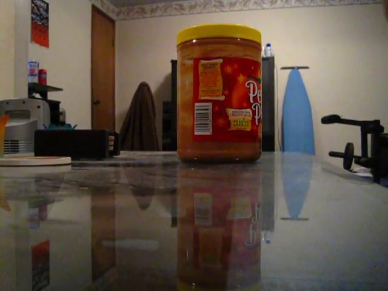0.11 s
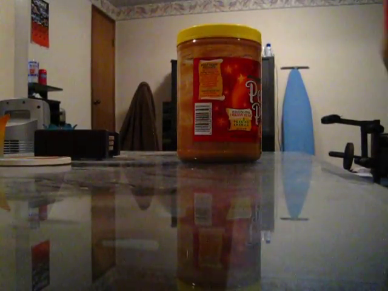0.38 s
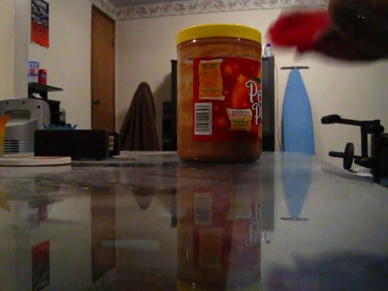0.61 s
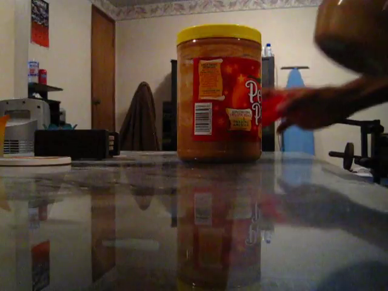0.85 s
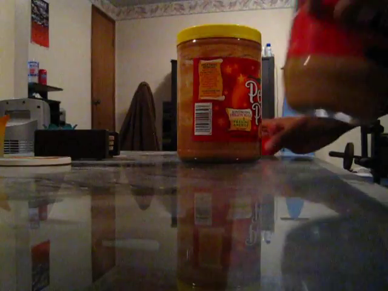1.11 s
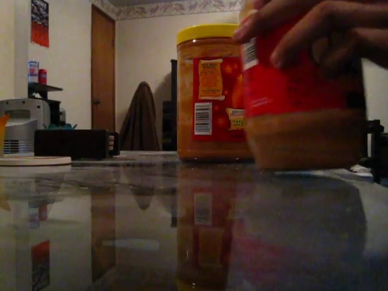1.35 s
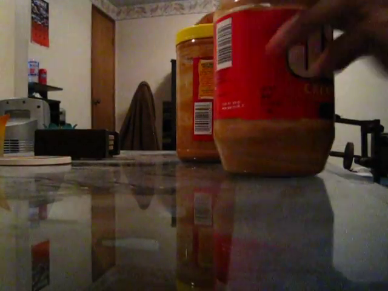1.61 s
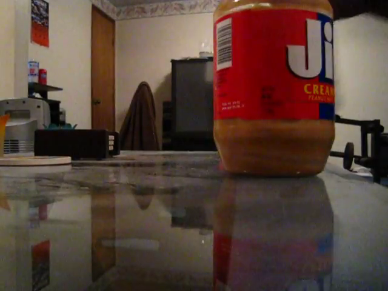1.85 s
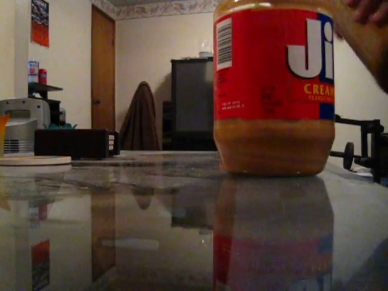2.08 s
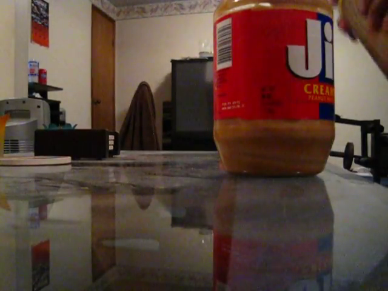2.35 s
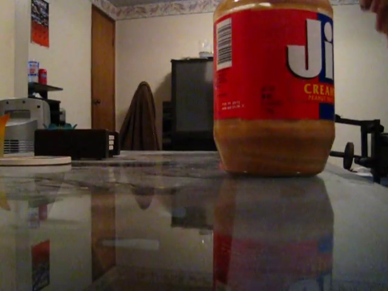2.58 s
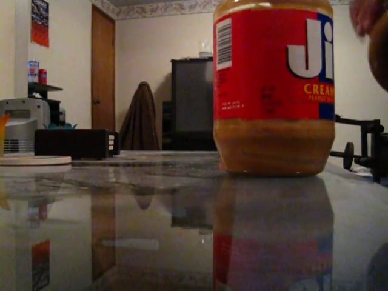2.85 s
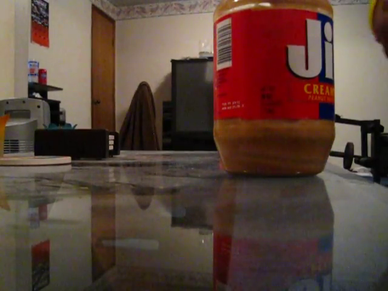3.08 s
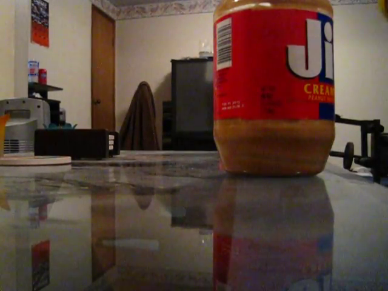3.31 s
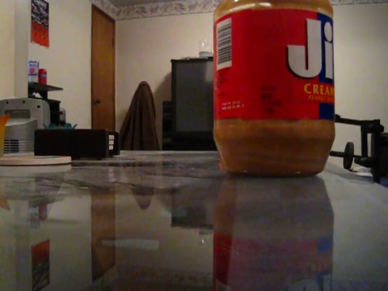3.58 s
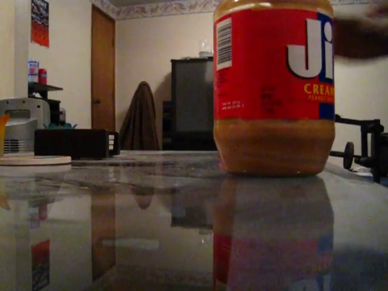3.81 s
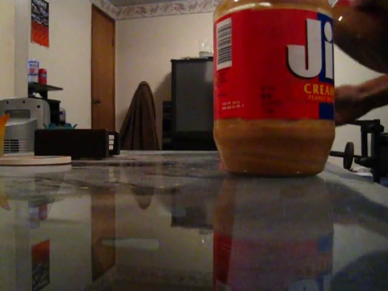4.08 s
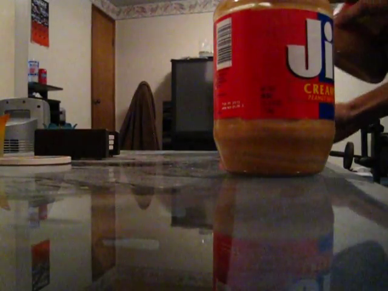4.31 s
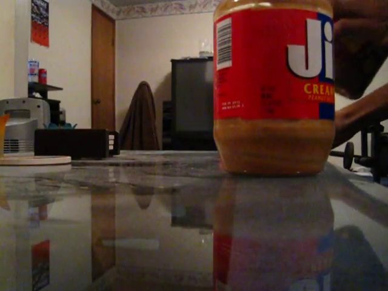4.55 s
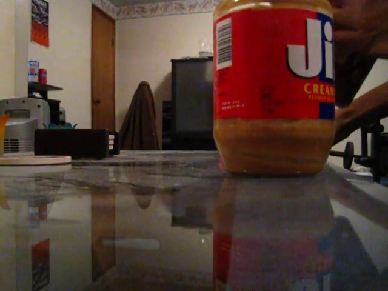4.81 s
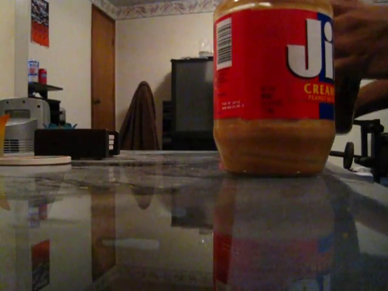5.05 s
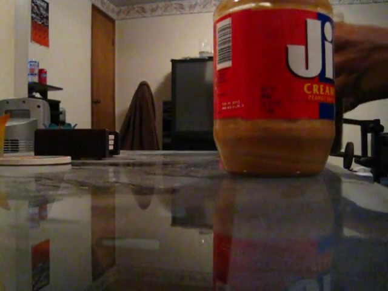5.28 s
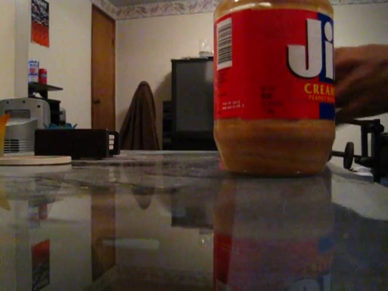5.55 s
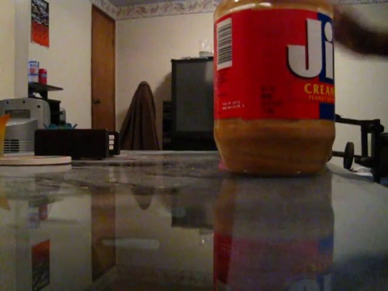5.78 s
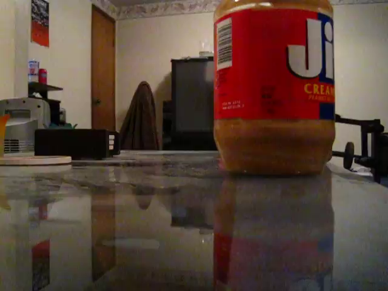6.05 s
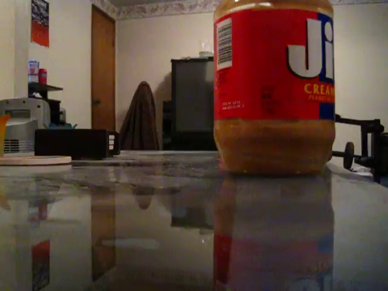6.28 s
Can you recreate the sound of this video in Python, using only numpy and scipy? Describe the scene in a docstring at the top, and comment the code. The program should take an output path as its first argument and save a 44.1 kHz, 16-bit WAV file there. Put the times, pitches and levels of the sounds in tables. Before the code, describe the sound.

A small close microphone, dipping in level after hard blows, catches full plastic jars being moved on a glass table. Soft knocks and papery rubbing lead to a sharp hard clack and a tumbling set-down. Sparse slides and ticks follow, then a second strong clack, a low crunchy thud with chattering glass, and a bright last snap, over steady room and fan noise.

```python
"""Full plastic jars clack, knocked together and handled: modes ring under noise cracks and short taps.
Knocked in the hand, later set down on a glass table, they thump, boom and snap (decaying sines, noise);
something loose chatters. Fingers scrape, squeak and slide on labels over a low gritty rumble (noise strokes).
A fan hums in a furnished room: steady noise and two wavering tones.
A close small camera turns its gain down for a moment after loud blows."""
import sys
import numpy as np
from scipy import signal
from scipy.fft import rfft, irfft, next_fast_len
from scipy.io import wavfile
from scipy.ndimage import uniform_filter1d, map_coordinates

SR = 44100
rng = np.random.default_rng(int(sys.argv[2]) if len(sys.argv) > 2 else 0)


def natural_amplitude(level_db):
    """Convert a level in decibels to a linear amplitude factor, elementwise."""
    exponent = np.asarray(level_db, float) / 20
    return 10 ** exponent


def generate_wav(sig):
    """Save sig (samples, or channels by samples) to the path in sys.argv[1] as 16-bit PCM at SR."""
    pcm = np.round(np.clip(np.atleast_2d(sig).T, -1, 1) * 32767).astype(np.int16)
    wavfile.write(sys.argv[1], SR, pcm)


N = 282504  # scene length, samples
SPAN = 14400  # length of one blow, samples
T = np.arange(SPAN) / SR


def unit(x):
    """Scaled to rms 1."""
    return x / np.sqrt(np.mean(x ** 2) + 1e-20)


def along(points, hz):
    """(f/Hz, value) points read on a log frequency axis."""
    f, v = np.transpose(points)
    return np.interp(np.log(hz + 1), np.log(f + 1), v)


def wobble(knots_per_s):
    """A smooth random curve."""
    knots = rng.standard_normal(int(N * knots_per_s / SR) + 4)
    return map_coordinates(knots, [np.arange(N) * knots_per_s / SR])


def coloured(noise, spectrum):
    """Noise filtered by (f/Hz, level/dB) points, rms 1."""
    m = next_fast_len(N + 8192)
    gain = natural_amplitude(along(spectrum, np.fft.rfftfreq(m, 1 / SR)))
    return unit(irfft(rfft(noise, m) * gain, m)[:N])


def add(track, start_s, sound):
    """Mixes a sound into a track at a time."""
    part = track[max(round(start_s * SR), 0):][:len(sound)]
    part += sound[:len(part)]


def stroke(start_s, length_s, first_db, last_db):
    """The gain of one stroke: quick touch, steady change of pressure, lift."""
    touch_db_per_s, lift_db_per_s = 516, 362
    t = np.arange(N) / SR - start_s
    fade_db = touch_db_per_s * np.maximum(-t, 0) + lift_db_per_s * np.maximum(t - length_s, 0)
    pressure_db = np.interp(t, [0, max(length_s, 0.005)], [first_db, last_db])
    return natural_amplitude(pressure_db - fade_db)


def ring(modes, centre_hz, octaves, freedom):
    """Modes near the blow's colour ring most; place and grip weigh and tune them anew each blow."""
    hz, db, t60_s = np.transpose(modes)[:, :, None]
    bell_db = -6 * (np.log2(hz / centre_hz) / octaves) ** 2
    db = db + bell_db + 1.54 * rng.standard_normal(hz.shape)
    hz = hz * (1 + 0.0083 * rng.standard_normal(hz.shape))
    decay = natural_amplitude(db - 60 * T / (freedom * t60_s))
    return np.sum(decay * np.sin(2 * np.pi * hz * T), axis=0)


def crack(centre_hz, octaves_below, octaves_above, t60_s, rise_s):
    """A dying burst of noise around one colour; rms 1 before rise and decay."""
    octaves = np.log2((np.fft.rfftfreq(SPAN, 1 / SR) + 1) / centre_hz)
    bell_db = -6 * (octaves / np.where(octaves < 0, octaves_below, octaves_above)) ** 2
    noise = unit(irfft(rfft(rng.standard_normal(SPAN)) * natural_amplitude(bell_db)))
    return noise * natural_amplitude(-60 * T / t60_s) * (1 - np.exp(-T / rise_s))


# room decay: (f/Hz, t60/s)
ROOM_T60 = [(200, 0.51), (1500, 0.19), (4500, 0.19), (6000, 0.17), (14000, 0.082)]


def reverberant(sound, wet_db):
    """A sound plus its room tail: noise dying at a rate set by frequency, drawn anew for each blow."""
    hz, t, z = signal.stft(rng.standard_normal(SPAN), SR, nperseg=256)
    decay = natural_amplitude(-60 * t / along(ROOM_T60, hz)[:, None])
    tail = signal.istft(z * decay, SR, nperseg=256)[1]
    tail = np.pad(tail / np.linalg.norm(tail), (130, 0))  # tail starts 130 samples late
    return sound + natural_amplitude(wet_db) * signal.fftconvolve(sound, tail)[:SPAN]


# room noise spectrum: (f/Hz, relative level/dB per Hz)
AIR_SPECTRUM = [(25, -11.5), (60, -10), (144, -7), (175, -5), (392, -9), (905, -13), (1730, -19),
                (4700, -27.5), (5400, -24.5), (15800, -30)]
# fan tones: (f/Hz, level/dB)
FAN_TONES = [(175, -58.5), (1051, -54.5)]


def room_tone():
    """Steady noise with the slightly unsteady tones of a fan."""
    air_gain = natural_amplitude(-48 + 0.86 * wobble(3.82))
    out = air_gain * coloured(rng.standard_normal(N), AIR_SPECTRUM)
    for hz, db in FAN_TONES:
        turns = np.cumsum(hz * (1 + 0.002006 * wobble(8))) / SR
        out += np.sqrt(2) * natural_amplitude(db + 0.8 * wobble(10)) * np.sin(2 * np.pi * turns)
    return out


# paper hiss spectrum before tilt: (f/Hz, relative level/dB per Hz)
HISS_SPECTRUM = [(4500, -3), (7000, -2), (9000, 4), (11500, -1), (15800, -9)]
# fingers on the paper label: (t/s, length/s, first level/dB, last level/dB, tilt/dB per octave)
SLIDES = [(0.07, 0.062, -41.5, -48, -8.5), (0.158, 0.087, -40, -46.5, -0.5), (1.963, 0.013, -44, -40.5, 0),
          (2.318, 0.14, -44, -54, -2.5), (2.457, 0.042, -43, -39.5, 4.5), (2.763, 0.093, -50.5, -46.5, -4),
          (2.9, 0.365, -55, -53.5, -1.5), (3.33, 0.1, -44.5, -47.5, 9.5), (3.46, 0.041, -51, -43, 1),
          (5.858, 0.1, -52.5, -54, -4)]


def slides():
    """Fingers slide over the paper label: fluttering fine hiss, tilted in brightness per stroke."""
    flutter_db = 2.5 * wobble(300) + 1.5 * wobble(40)
    paper = rng.standard_normal(N) * natural_amplitude(flutter_db)
    out = np.zeros(N)
    for *row, tilt_db in SLIDES:
        tilted = [(hz, db + tilt_db * np.log2(hz)) for hz, db in HISS_SPECTRUM]
        out += stroke(*row) * coloured(paper, tilted)
    return out


# rumble spectrum: (f/Hz, relative level/dB per Hz)
RUMBLE_SPECTRUM = [(120, -16), (230, -1), (400, 5), (700, -3), (1100, -23)]
# low rubbing strokes: (t/s, length/s, first level/dB, last level/dB)
RUMBLES = [(0.094, 0.025, -31, -36.5), (0.182, 0.069, -34.5, -33), (5.38, 0.0061, -50, -20.5)]


def rumbles(grit):
    """Low gritty rumble as the jar is handled and set down: coloured noise under stroke gains."""
    rumble = coloured(rng.standard_normal(N) * grit, RUMBLE_SPECTRUM)
    return rumble * sum(stroke(*row) for row in RUMBLES)


# scrape spectrum: (f/Hz, relative level/dB per Hz)
SCRAPE_SPECTRUM = [(700, 4), (1300, 4.5), (1900, 6.5), (2600, -6.5), (4000, -6), (5000, -11), (6500, -48)]
# fingers on the jar wall: (t/s, length/s, first level/dB, last level/dB)
SCRAPES = [(0.067, 0.06, -48.5, -37.5), (0.21, 0.048, -36.5, -62), (1.293, 0.2, -47, -31.5),
           (1.958, 0.025, -43, -46), (2.481, 0.031, -52.5, -52.5), (2.837, 0.11, -42, -55.5),
           (3.023, 0.27, -51.5, -63), (3.458, 0.035, -45.5, -41), (4.62, 0.067, -46.5, -55)]


def scrapes(grit):
    """Fingers drag on the jar wall: gritty noise."""
    scrape = coloured(rng.standard_normal(N) * grit, SCRAPE_SPECTRUM)
    return scrape * sum(stroke(*row) for row in SCRAPES)


# fingertip on the jar wall: (t/s, length/s, level/dB, f/Hz)
SQUEAKS = [(1.437, 0.022, -39, 1800), (4.41, 0.12, -51.5, 1880)]


def squeaks(grit):
    """A fingertip squeaks on the jar wall: narrow noise around one pitch."""
    out = np.zeros(N)
    for start_s, length_s, db, hz in SQUEAKS:
        narrow = [(hz / 2, -60), (hz / 1.4, -10), (hz / 1.2, -16), (hz, 0), (hz * 1.4, -60)]
        squeak = coloured(rng.standard_normal(N), narrow) * grit
        out += squeak * stroke(start_s, length_s, db, db)
    return out


def rubs():
    """Rubbing sticks and slips: one grit gain shared by scrapes, rumbles and squeaks; paper flutters apart."""
    grit = natural_amplitude(4 * wobble(160) + 2 * wobble(45))
    return scrapes(grit) + rumbles(grit) + squeaks(grit) + slides()


def chatter(count=8):
    """Something loose ticks on the shaking glass, tending weaker and duller; no room tail."""
    start_s, gap_s, jitter_s = 5.3812, 0.0167, 0.00015
    first_hz, hz_ratio = 9700, 0.96
    first_db, loss_db, spread_db = -16, 2.4, 2.7
    out = np.zeros(N)
    for k, (late, louder) in enumerate(rng.standard_normal((count, 2))):
        if k % 3 == 2:  # every third swing is silent
            continue
        tick = crack(first_hz * hz_ratio ** k, 1.3, 0.47, t60_s=0.0074, rise_s=0.00021)
        db = first_db - k * loss_db + spread_db * louder
        add(out, start_s + k * gap_s + jitter_s * late, natural_amplitude(db) * tick)
    return out


# lasting modes of the whole pane: (f/Hz, level/dB, t60/s)
BOOM_MODES = [(61.5, -3, 0.56), (496, -8, .45)]
# heavy landings: (t/s, level/dB)
BOOMS = [(1.369, -38), (1.49, -48), (5.366, -32), (5.409, -28)]


def booms():
    """Heavy landings set the whole pane swinging; it holds a while, then dies quickly."""
    out, t = np.zeros(N), np.arange(SR) / SR
    for start_s, db in BOOMS:
        swing = np.zeros(SR)
        for hz, mode_db, t60_s in BOOM_MODES:
            decay = natural_amplitude(mode_db - 60 * (t / t60_s) ** 2)
            swing += decay * np.sin(2 * np.pi * hz * (t + start_s))
        add(out, start_s, natural_amplitude(db) * (1 - np.exp(-t / 0.003)) * swing)
    return out


# something small and stiff: (t/s, level/dB, f/Hz)
SNAPS = [(0.257, -22.5, 4000), (0.412, -31, 3750), (1.361, -48, 4700), (1.399, -40, 4670),
         (1.452, -38, 4600), (2.787, -26.5, 1720), (2.917, -41, 2620), (3.474, -42, 6000),
         (3.496, -27.5, 4340), (3.758, -41, 1800), (3.946, -42, 2000), (6.3319, -15, 3520)]


def snaps():
    """Dry snaps: one quickly dying note with an edge that brightens with force, almost without room."""
    out = np.zeros(N)
    for start_s, db, hz in SNAPS:
        note = natural_amplitude(5) * np.sin(2 * np.pi * hz * T) * natural_amplitude(-60 * T * hz / 14)  # -60 dB in 14 cycles
        octaves_above = max(2.0 + 0.022 * db, 0.5)
        edge = natural_amplitude(-3) * crack(1.13 * hz, 0.88, octaves_above, t60_s=0.013, rise_s=0.000061)
        add(out, start_s, natural_amplitude(db) * reverberant(note + edge, wet_db=-18.5))
    return out


# low modes, as of a glass pane: (f/Hz, level/dB, t60 at freedom 1/s)
THUMP_MODES = [(117, -4.5, 0.18), (171, 2.5, 0.082), (265.5, -4, 0.17), (387, -5.5, 0.25),
               (451.6, 3.5, 0.1), (593, 11, 0.017), (750, -8, 0.059), (838, -1, 0.057), (1163, -9, 0.22)]
# low thumps: (t/s, level/dB, colour centre f/Hz, freedom to ring: low when damped)
THUMPS = [(0.012, -18.5, 548, 0.092), (0.077, -14, 577, 0.09), (0.111, -19, 440, 0.088),
          (0.173, -21.5, 490, 0.14), (0.1963, -25.5, 477, 0.1), (0.224, -29.5, 420, 0.11),
          (0.238, -20.5, 557, 0.3), (1.371, -31, 184, 0.8), (1.4916, -28.5, 206, 0.8),
          (2.696, -34, 237, 0.82), (2.787, -31.5, 312, 0.56), (2.892, -43, 390, 0.96),
          (3.498, -37, 440, 0.39), (5.367, -22.5, 460, 1), (5.376, -18, 513, 0.23),
          (5.385, -23.5, 130, 0.52), (5.392, -14, 766, 0.42), (5.408, -23, 620, 0.78),
          (5.43, -22, 262, 0.49), (5.457, -24, 654, 0.81)]


def thumps():
    """Low thumps: a jar knocked in the hand, later jars set down; the less damped, the more crunch and ring."""
    out = np.zeros(N)
    for start_s, db, centre_hz, freedom in THUMPS:
        freedom = max(freedom, 0.1)
        thump = 2.12 * np.sin(2 * np.pi * centre_hz * T) * natural_amplitude(-60 * T * centre_hz / 11)  # 11 cycles
        ringing = freedom * natural_amplitude(4.5) * ring(THUMP_MODES, centre_hz, 1.0, freedom)
        knock = (thump + ringing) * (1 - np.exp(-T / 0.0013))
        crunch = freedom * natural_amplitude(-1.0) * crack(centre_hz, 0.43, 1.46, 0.16 * freedom, rise_s=0.001)
        add(out, start_s, natural_amplitude(db) * reverberant(knock + crunch, wet_db=-10))
    return out


# jar wall and lid modes: (f/Hz, level/dB, t60 of the free jar/s)
JAR_MODES = [(393, 2.5, 0.12), (802.4, -8, 0.31), (1237, 5.5, 0.045), (1560, 6, 0.027), (1800, -3.5, 0.12),
             (2132, 4, 0.07), (2690, 1.5, 0.067), (3510, -8, 0.17), (3906, 6, 0.075), (4440, 3, 0.086),
             (4690, 5, 0.029), (6120, 5, 0.05), (7690, 0, 0.086)]
# hard plastic blows: (t/s, level/dB, colour centre/octaves above 1 kHz, contact softness/ms)
CLACKS = [(0.0107, -29.5, 1, 0.49), (0.0749, -31, 1.24, 0.47), (0.2373, -20.5, 0.87, 1.1),
          (0.2466, -21, 1.08, 0.1), (1.014, -2.5, 0.915, 0.75), (1.1762, -16, 1.04, 2.1),
          (1.2452, -17, 1.05, 3.4), (1.3005, -24.5, 0.94, 2.7), (1.311, -23, 0.48, 1.3),
          (1.357, -20.5, 0.61, 1.1), (1.369, -21.5, 0.68, 0.18), (1.397, -21.5, 0.63, 1.7),
          (1.449, -19, 1, 1.9), (1.4694, -16, 1.3, 1), (1.955, -31, 1.8, 0.56), (2.3069, -32.5, 1.4, 2.2),
          (2.699, -32, 0.7, 0.3), (2.882, -34.5, 1.4, .25), (3.4958, -26, 1.22, 0.4),
          (4.293, -6.5, 0.87, 0.62), (4.503, -31.5, 0.66, 2.8), (5.3646, -20, 0.56, 0.55),
          (5.3913, -17, 0.92, 0.43), (5.4095, -19, 0.33, 0.31), (5.4576, -23.5, 0.57, 0.17)]


def clacks():
    """The full jar rings under a crack; glancing contacts start softer and grate longer, hard ones brighter."""
    contact_t60_s, t60_per_rise = 0.017, 4.2
    jar_freedom = 0.68  # share of the free ring time left by hand and contents
    out = np.zeros(N)
    for start_s, db, above, soft_ms in CLACKS:
        centre_hz, rise_s = 1000 * 2 ** above, max(soft_ms, 0.1) / 1000
        octaves = max(1.53 + 0.019 * db, 0.5)
        t60_s = contact_t60_s + t60_per_rise * rise_s
        snap = natural_amplitude(-3.0) * crack(centre_hz, 1.0, octaves, t60_s, rise_s)
        # the struck spot flexes: -60 dB in 24 cycles
        tap = natural_amplitude(3.0) * np.sin(2 * np.pi * centre_hz * T) * natural_amplitude(-60 * T * centre_hz / 24)
        jar = natural_amplitude(-17.5) * ring(JAR_MODES, centre_hz, octaves, jar_freedom)
        body = (tap + jar) * (1 - np.exp(-T / rise_s))
        add(out, start_s, natural_amplitude(db) * reverberant(snap + body, wet_db=-9))
    return out


def scene():
    """All sources, heard from one point."""
    return (room_tone() + rubs() + chatter() + booms() + snaps() + thumps() + clacks())[None]


def gain_control(dry):
    """Gain drops when a blow passes the threshold, by 8 dB at most, and slowly recovers."""
    threshold_db, attack_s, recovery_s = -14, 0.0067, 0.25
    over_db = np.maximum(20 * np.log10(np.abs(dry) + 1e-9) - threshold_db, 0)
    held_db = uniform_filter1d(over_db, 220, axis=1)
    keep = np.exp(-1 / (recovery_s * SR))
    cut_db = signal.lfilter([1 / (attack_s * SR)], [1, -keep], held_db, axis=1)
    return dry * natural_amplitude(-np.minimum(cut_db, 8))


# microphone behind its port: (f/Hz, level/dB)
MIC_RESPONSE = [(4700, 1), (5400, -3.5), (12000, -6.5)]


def microphone(sound):
    """Microphone colour; the band ends sharply."""
    top_hz = 15850
    hz = np.fft.rfftfreq(N, 1 / SR)
    return irfft(rfft(sound) * natural_amplitude(along(MIC_RESPONSE, hz)) * (hz < top_hz), N)


def top_cut(x):
    """Nothing passes above the cut-off."""
    return signal.sosfilt(signal.butter(12, 16740, fs=SR, output="sos"), x)


def record(dry):
    """The camera: gain control, then microphone colour."""
    mix = microphone(gain_control(dry))
    return top_cut(mix)


dry = scene()
out = record(dry)
generate_wav(out)
```